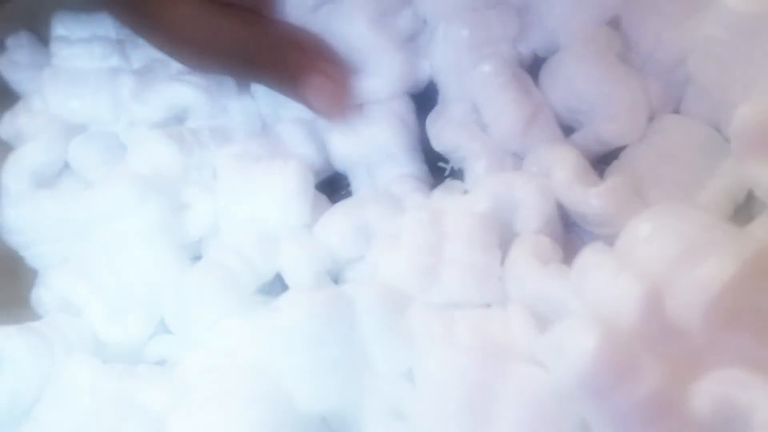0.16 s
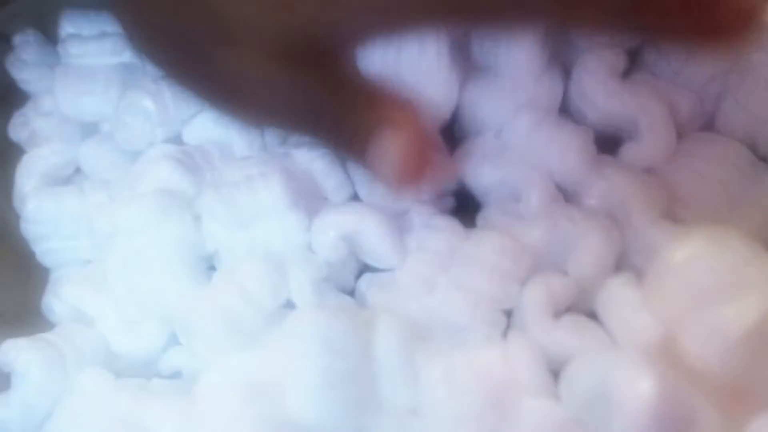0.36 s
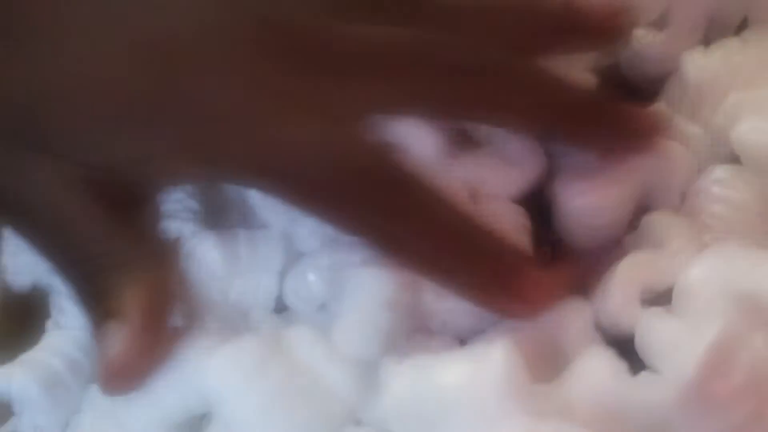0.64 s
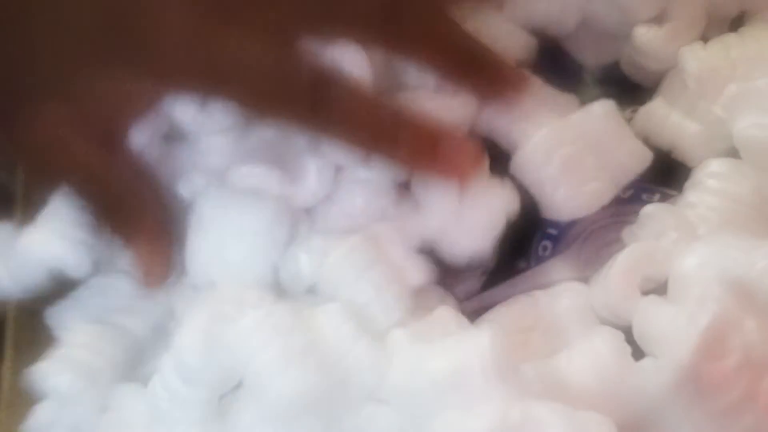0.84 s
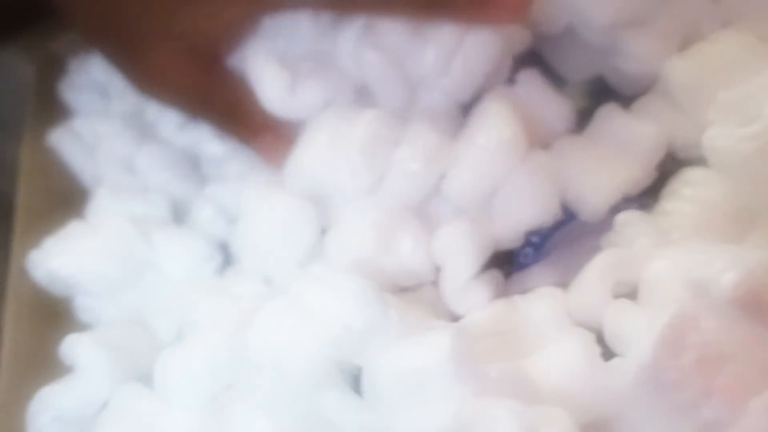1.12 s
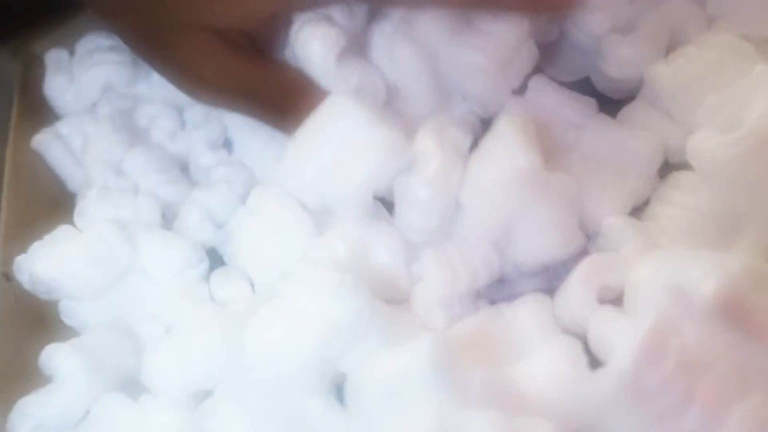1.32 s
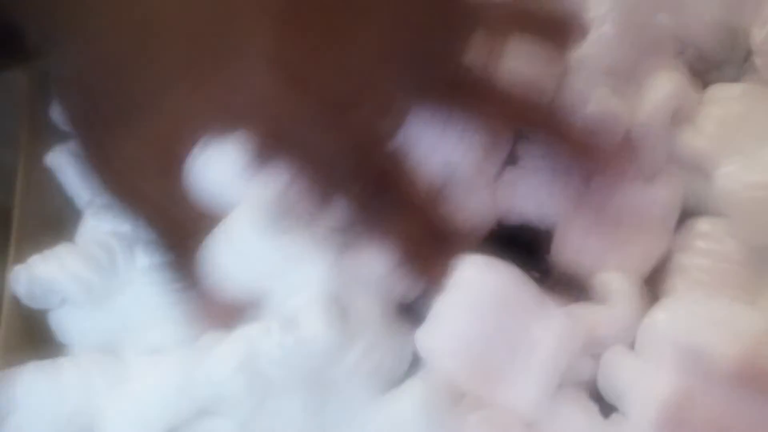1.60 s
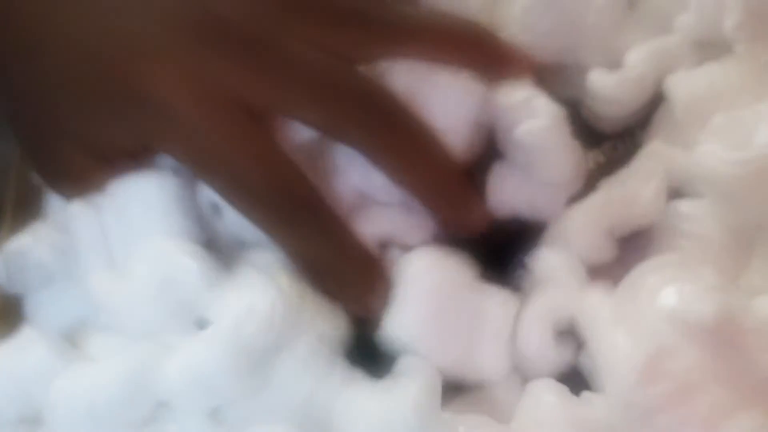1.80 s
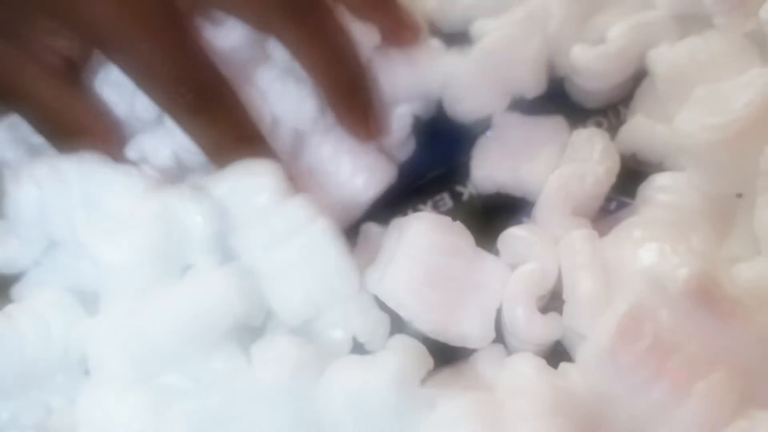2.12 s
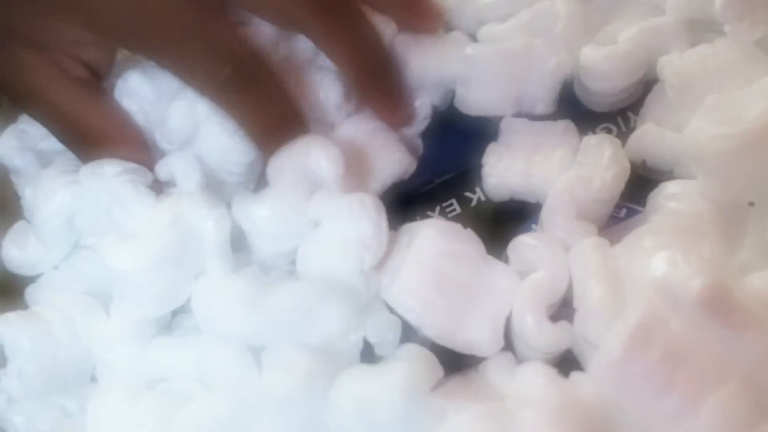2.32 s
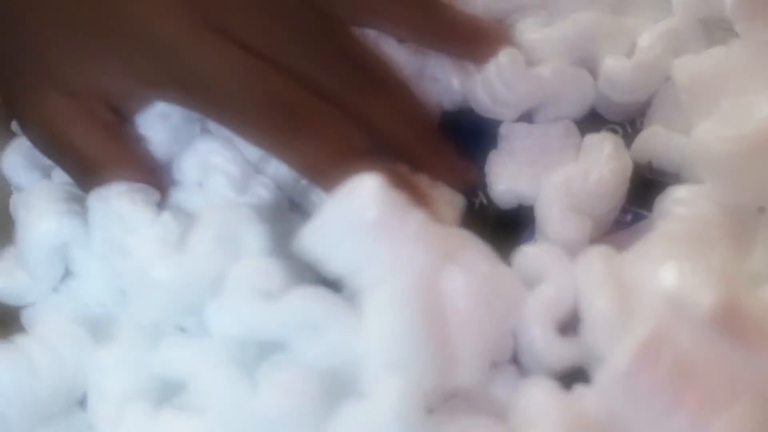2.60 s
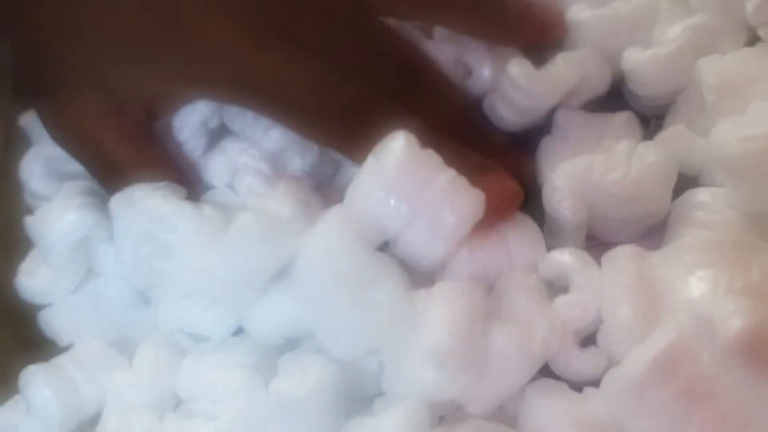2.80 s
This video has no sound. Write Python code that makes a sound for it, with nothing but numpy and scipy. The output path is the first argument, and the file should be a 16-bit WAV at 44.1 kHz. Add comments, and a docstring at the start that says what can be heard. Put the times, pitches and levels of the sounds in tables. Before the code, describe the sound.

Foam packing peanuts rustle, bright and crackly, from the start as a hand digs through a box close to a small microphone. Light hollow knocks begin at 0.1 s, short squeaks at 0.3 s, clustering around 1.3 and 1.75 s. The hardest knock hits at 2.19 s; rustling thins, tiny high squeaks follow near 2.4 s, then it surges and sinks until 3 s. Faint hum and low rumble lie beneath.

```python
"""A hand digs through a box of foam packing peanuts close under a camera microphone.
From the start a bright rustle (trains of tiny foam slips) runs over a faint hum and low rumble.
Knocks (ringing box modes) join at 0.1 s, squeaks (fuzzy gliding tones) at 0.3 s.
The hardest knock falls at 2.19 s as the rustle thins; brief high squeaks follow near 2.4 s.
Rustle then surges and sinks, with a few light knocks and squeaks up to 2.7 s."""
import sys
import numpy as np
from scipy import signal
from scipy.fft import rfft, irfft, next_fast_len
from scipy.io import wavfile
from scipy.ndimage import uniform_filter1d

SR = 44100
rng = np.random.default_rng(int(sys.argv[2]) if len(sys.argv) > 2 else 0)


def master(y):
    """Save y as 16-bit WAV."""
    cut = np.clip(np.atleast_2d(y).T, -1, 1)
    pcm = np.round(cut * 32767)  # scale
    wavfile.write(sys.argv[1], SR, pcm.astype(np.int16))


N = 130095
EDGE_HZ = 15950  # upper band limit


def amp(db):
    """dB to linear amplitude."""
    return 10 ** (np.asarray(db) / 20)


def evened(x):
    """Scales to unit RMS."""
    return x / np.sqrt(np.mean(x ** 2) + 1e-20)


def smooth_noise(samples):
    """Unit-RMS noise, moving-averaged: a slow random swell."""
    return evened(uniform_filter1d(rng.standard_normal(N), samples))


def coloured(x, points):
    """Filters by an (f/Hz, level/dB) table, interpolated over log frequency."""
    f, db = np.transpose(points)
    size = next_fast_len(N + 4096)
    hz = np.fft.rfftfreq(size, 1 / SR)
    gain = amp(np.interp(np.log(hz + 1), np.log(f + 1), db))
    return irfft(rfft(x, size) * gain, size)[..., :N]


def add(mix, s, sound, pan_db=0):
    """Adds a mono sound at s seconds; pan_db is left minus right."""
    part = mix[:, round(s * SR):][:, :len(sound)]
    part += sound[:part.shape[1]] * amp([[pan_db / 2], [-pan_db / 2]])


HUM_HZ, HUM_DRIFT_RMS_HZ = 440, 2
HUM_RMS_DB, HUM_WAVER_RMS_DB = -58, 2


def hum():
    """Appliance hum: one sine, slow random drift in pitch and level."""
    noises = rng.standard_normal((2, N))
    drift, waver = (evened(uniform_filter1d(uniform_filter1d(v, SR // 10), SR // 10)) for v in noises)
    phase = 2 * np.pi * np.cumsum(HUM_HZ + HUM_DRIFT_RMS_HZ * drift) / SR
    return amp(HUM_RMS_DB + HUM_WAVER_RMS_DB * waver) * np.sqrt(2) * np.sin(phase)


# Rumble spectrum shape: [f/Hz, relative level/dB per Hz]
RUMBLE_COLOUR = [(20, -42), (40, -17), (90, -12.5), (130, -7.5), (200, -6), (400, -35.5)]
RUMBLE_FLOOR_DB, RUMBLE_SIDE_DB = -79.5, -26  # RMS at the weakest bumping; side re mid
RUMBLE_FOLLOWS = 1  # dB per dB of bumping


def rumble():
    """Low-frequency noise, nearly mono, swelling with the dull bumping of the digging."""
    mid, side = coloured(rng.standard_normal((2, N)), RUMBLE_COLOUR)
    s, bump = np.transpose(LOWER_RUSTLE)[[0, 2]]
    swell = amp(RUMBLE_FOLLOWS * np.interp(np.arange(N) / SR, s, bump - bump.min()))
    noise = evened(mid + amp(RUMBLE_SIDE_DB) * np.array([side, -side]))
    return amp(RUMBLE_FLOOR_DB) * swell * noise


# Rubs of foam on foam: [t/s, RMS level before the envelope/dB, centre f/Hz, length/s,
# glide as share of f (+ rises)]
SQUEAKS = [(0.328, -26, 3220, 0.018, .01), (.52, -30, 8450, 0.026, -0.02), (.68, -28, 7250, 0.018, .01),
           (1.038, -24.5, 7450, 0.022, -0.028), (1.215, -37, 2710, 0.032, -0.02),
           (1.257, -29, 3460, 0.05, 0.12), (1.297, -22, 6900, 0.018, -0.061),
           (1.302, -29, 2830, 0.021, 0.067), (1.342, -28, 3700, 0.022, 0.023),
           (1.62, -27, 13200, 0.012, -0.0021), (1.699, -25.5, 4480, 0.023, -0.053),
           (1.733, -28, 8400, 0.03, -0.0056), (1.743, -22, 6000, 0.063, 0.067),
           (1.773, -27, 5320, 0.043, -.03), (1.78, -27, 9500, 0.0254, 0.21),
           (1.819, -25, 9700, 0.0265, 0.048), (2.074, -25.5, 5250, 0.087, 0.04),
           (2.12, -31, 2043, 0.062, -0.226), (2.13, -29, 12700, .025, .01),
           (2.176, -20, 10750, 0.0042, -0.18), (2.205, -21, 8000, 0.0052, 0.28),
           (2.356, -22, 6200, 0.0016, 0.27), (2.374, -22, 7900, 0.0022, 0.37),
           (2.397, -18.5, 11700, 0.0058, 0.08), (2.565, -28, 8660, 0.017, 0.042),
           (2.673, -30, 3700, 0.04, -0.1)]
FLUTTER_CYCLES, OVERTONE_DB = 5.1, -9  # noise smoothing in cycles of f; 2f re f


def squeaks():
    """Fast stick-slip of two peanuts: noise-modulated gliding tone plus octave overtone."""
    out = np.zeros((2, N))
    for s, db, hz, length_s, glide in SQUEAKS:
        u = np.linspace(0, 1, int(length_s * SR) + 2)
        span = max(int(FLUTTER_CYCLES * SR / hz), 2)
        noise = rng.standard_normal((4, 6000))
        a, b, c, d = uniform_filter1d(uniform_filter1d(noise, span), span)[:, :len(u)]
        turn = 2 * np.pi * np.cumsum(hz * (1 + glide * (u - .5))) / SR
        tone = a * np.sin(turn) + b * np.cos(turn)
        if 2 * hz < EDGE_HZ:
            tone = tone + amp(OVERTONE_DB) * (c * np.sin(2 * turn) + d * np.cos(2 * turn))
        envelope = np.sqrt(abs(np.sin(np.pi * u)))
        add(out, s, amp(db) * envelope * evened(tone))
    return out


# Knocks on the box: [t/s, dry peak level before panning/dB, f/Hz]
KNOCKS = [(.09, -16, 950), (.492, -18, 1020), (.512, -22, 1030), (.625, -16, 610), (.665, -22, 864),
          (.844, -16.5, 840), (0.949, -17, 1080), (.965, -19.5, 1020), (0.993, -19, 824),
          (1.036, -26, 1200), (1.075, -19, 1050), (1.234, -20, 910), (1.467, -22.5, 1000),
          (1.553, -17, 840), (1.688, -12, 875), (1.75, -19, 1270), (1.984, -19.5, 960), (2.186, -2.5, 1335),
          (2.588, -22, 1040), (2.612, -22, 850), (2.663, -26, 1400)]
# Box wall modes: [multiple of knock f, level at HARD_DB/dB, T60/s]
BOX_MODES = [(.26, -18, .05), (.44, -14, .035), (.61, -3, .03), (.76, -5, .025), (1, 1, .026),
             (1.29, 0, .026), (1.78, 0, .024), (2.45, -3, .014)]
HARD_DB, SOFTENS = -3, .7  # side modes: change in dB per dB of knock level re HARD_DB
SNAP_DB, SNAP_T60_S, SNAP_TOP = -8, 0.005, 3  # low-pass at SNAP_TOP times f
KNOCK_LAG_S, KNOCK_PAN_DB = .0015, -1.5  # added to t; left minus right


def knocks():
    """Impact on the box wall: noisy snap plus short decaying modes, slightly detuned."""
    out = np.zeros((2, N))
    t = np.arange(int(.1 * SR)) / SR
    for s, db, hz in KNOCKS:
        ring = np.zeros(len(t))
        for multiple, mode_db, t60_s in BOX_MODES:
            if multiple != 1:
                mode_db = mode_db + SOFTENS * (db - HARD_DB)
            mode_hz = hz * multiple * rng.uniform(0.98, 1.02)
            ring += amp(mode_db - 60 * t / t60_s) * np.sin(2 * np.pi * mode_hz * t)
        b, a = signal.butter(2, SNAP_TOP * hz, fs=SR)
        snap = evened(signal.lfilter(b, a, rng.standard_normal(len(t))))
        hit = ring + amp(SNAP_DB - 60 * t / SNAP_T60_S) * snap
        add(out, s + KNOCK_LAG_S, -amp(db) * hit / abs(hit).max(), KNOCK_PAN_DB)
    return out


TAIL_T60_S, TAIL_DB, TAIL_WIDTH = .04, -8, 0.18  # width: side re mid, linear


def in_box(hits):
    """Diffuse tail inside the box: hits convolved with decaying stereo noise."""
    t = np.arange(int(.12 * SR)) / SR
    decay = amp(-60 * t / TAIL_T60_S) * (t > .001)
    common, apart = rng.standard_normal((2, len(t))) * decay
    tail = np.array([common + TAIL_WIDTH * apart, common - TAIL_WIDTH * apart])
    tail /= np.linalg.norm(common)
    return hits + amp(TAIL_DB) * signal.oaconvolve(hits.mean(0)[None], tail, axes=1)[:, :N]


MIC_CUT_HZ = 380


def small_mic(hits):
    """Bass loss of the small microphone: 4th-order high-pass."""
    return signal.sosfilt(signal.butter(4, MIC_CUT_HZ, "high", fs=SR, output="sos"), hits)


# Digging: [t/s, rustle level/dB, fine crackle re rustle/dB]; crackle sum used re its mean
DIG = [(0.002, -20.5, -14), (0.017, -26, -2), (0.041, -32, -6), (0.082, -26.5, -1.5), (0.137, -28, -3),
       (0.167, -23, -9), (0.197, -27, -5), (0.267, -18.5, -7), (0.297, -20.5, -4.5), (0.407, -21.5, -3),
       (0.446, -22.5, -6.5), (0.531, -23, -2), (0.671, -18.5, -10), (0.716, -24, -7), (0.761, -21.5, -5.5),
       (0.791, -25, -11), (0.821, -25, -4.5), (0.851, -25, -6), (0.96, -22, -3.5), (1.0, -27.5, -0.5),
       (1.04, -20.5, -6.5), (1.095, -27, -9), (1.125, -27.5, -6), (1.15, -20.5, -4), (1.185, -24.5, -12),
       (1.23, -22, -6), (1.265, -21.5, -7), (1.334, -27, -3.5), (1.354, -23, -11), (1.404, -24.5, -5.5),
       (1.479, -19.5, -9), (1.554, -20.5, -5.5), (1.639, -21, -7), (1.704, -22.5, -4.5), (1.754, -22, -6),
       (1.783, -25, 2), (1.818, -25.5, -5.5), (1.838, -22.5, -5.5), (1.903, -27, -5.5), (2.048, -23, -10.5),
       (2.093, -21.5, -7.5), (2.148, -24.5, -3.5), (2.178, -21.5, -6), (2.198, -31, -4), (2.222, -29, -4),
       (2.247, -32.5, -6), (2.287, -35, -6), (2.332, -33.5, -3), (2.367, -27.5, -6.5), (2.397, -25, -9),
       (2.432, -22, -3), (2.447, -24.5, -3), (2.472, -32, -10), (2.497, -26.5, -6.5), (2.542, -33.5, -5),
       (2.572, -28, 3), (2.602, -34, -8), (2.641, -24, -2.5), (2.676, -21, -8.5), (2.716, -23.5, -6),
       (2.776, -31, -4), (2.826, -26, -8), (2.911, -34.5, -5), (2.946, -31, -10)]
# Lower rustle, used re column means: [t/s, scraping level/dB, dull bumping level/dB]
LOWER_RUSTLE = [(0.002, -35, -31), (0.047, -38.5, -34), (0.267, -32, -31), (0.337, -33, -34),
                (0.437, -36, -34.5), (0.496, -31.5, -33), (0.556, -33.5, -33.5), (0.616, -32, -28.5),
                (0.756, -32.5, -31), (0.841, -41, -34), (0.9, -33, -33), (0.955, -34.5, -29.5),
                (1.11, -36, -34.5), (1.25, -29.5, -31), (1.334, -33, -35), (1.564, -32.5, -31),
                (1.634, -34.5, -32), (1.704, -32.5, -30.5), (1.908, -34, -36), (2.008, -37.5, -31.5),
                (2.093, -35, -37.5), (2.15, -33, -32), (2.242, -38.5, -36.5), (2.292, -42, -43),
                (2.417, -35.5, -37.5), (2.532, -40.5, -39.5), (2.602, -40, -38.0), (2.701, -34.5, -35.5),
                (2.766, -34.5, -37), (2.946, -40.5, -39)]
# Rustle spectrum shape at the microphone: [f/Hz, relative level/dB per Hz]
FOAM_COLOUR = [(25, -80), (88, -49), (150, -33), (340, -12), (502, -10.5), (587, -9), (919, -4),
               (2000, -5.5), (2740, -0.5), (4200, 1), (8470, -0.5), (13500, -7), (15800, -10)]
# Width of the heap: [f/Hz, side re mid/dB]
HEAP_WIDTH = [(60, -29), (130, -29), (290, -17), (640, -15.5), (1410, -18.5), (3100, -19.5), (6820, -14),
              (15000, -12.5)]
BAND_HZ = [900, 2220, 5300, 12700]  # bump, scrape, body, crackle
WIDE_BAND_DB = 1.5  # makeup gain
SLIPS_PER_S_PER_HZ, SLIP_SPREAD_DB = .25, 2  # rate slope over f + 400 Hz; mean excess
SLIP_CYCLES, RING_SPREAD_OCT = 2.26, 0.7  # shortest length scale; step between 3 lengths
CLUMP_DB, CLUMP_S = 0.625, 0.0072  # bunching, inverted in the bump band
PATCH_DB, PATCH_S = 1.27, 0.031  # independent swell per slip pitch
SCUFF_DB, SCUFF_S = 1.5, 0.015  # uneven crackle, half depth in the body band


def rustle(count=72):
    """Foam slips: random trains of short decaying tones at many pitches, scattered in stereo."""
    t = np.arange(N) / SR
    level, crackle = (np.interp(t, DIG_col_t, col) for DIG_col_t, col in
                      ((np.transpose(DIG)[0], col) for col in np.transpose(DIG)[1:]))
    lower_t, *lower = np.transpose(LOWER_RUSTLE)
    scrape, bump = (np.interp(t, lower_t, col) for col in lower)
    swell = np.array([v - v.mean() for v in (bump, scrape, level, level + crackle)])
    clump = smooth_noise(int(CLUMP_S * SR))
    scuff = smooth_noise(int(SCUFF_S * SR))
    flat, shaped = np.zeros(N), np.zeros((2, N))  # flat: level reference without swells
    for k, hz in enumerate(np.geomspace(150, 17000, count)):
        cycles = SLIP_CYCLES * 2 ** (RING_SPREAD_OCT * (k % 3))
        u = np.arange(int(4 * cycles * SR / hz) + 8) * hz / SR / cycles
        slip = u * np.exp(-3 * u) * np.sin(2 * np.pi * cycles * u)
        size = amp(SLIP_SPREAD_DB * np.minimum(rng.exponential(1, N), 5))
        size *= rng.choice([-1., 1.], N)
        train = size * (rng.random(N) < SLIPS_PER_S_PER_HZ * (hz + 400) / SR)
        places = [np.ones(N), rng.standard_normal(N)]  # mid, side
        grains = signal.oaconvolve(train * places, slip[None], axes=1)[:, :N]
        grains *= np.sqrt(hz / np.mean(grains[0] ** 2))
        share = np.array([np.interp(np.log(hz), np.log(BAND_HZ), w) for w in np.eye(4)])
        gain_db = level.mean() + share @ swell
        gain_db += (1 - 2 * share[0]) * CLUMP_DB * clump
        gain_db += PATCH_DB * smooth_noise(int(PATCH_S * SR))
        gain_db += (share[2] / 2 + share[3]) * SCUFF_DB * scuff
        shaped += grains * amp(gain_db)
        flat += grains[0]
    reference = np.sqrt(np.mean(coloured(flat, FOAM_COLOUR) ** 2))
    mid, side = coloured(shaped, FOAM_COLOUR) / reference * amp(WIDE_BAND_DB)
    side = coloured(side, HEAP_WIDTH)
    return np.array([mid + side, mid - side])


def scene():
    """Sums all sources; only knocks pass the box tail and microphone bass cut."""
    hits = small_mic(in_box(knocks()))
    return hum() + rumble() + squeaks() + hits + rustle()


def record(dry):
    """Band limit: linear-phase FIR low-pass at EDGE_HZ."""
    low_pass = signal.firwin(1023, EDGE_HZ, window=("kaiser", 10), fs=SR)
    return signal.oaconvolve(dry, low_pass[None], "same")


dry = scene()
out = record(dry)
master(out)
```